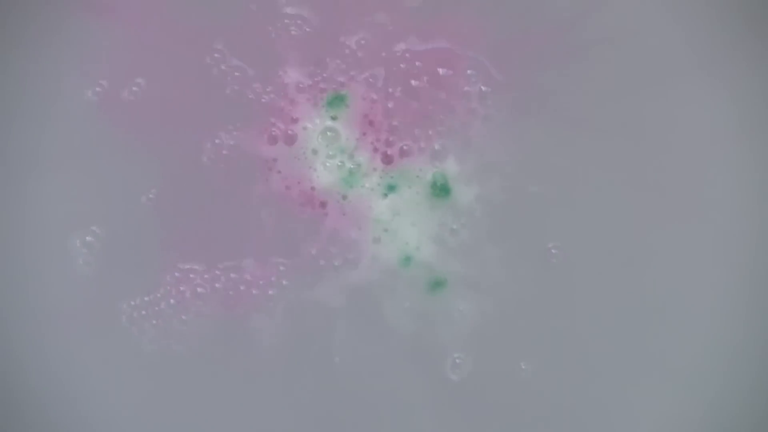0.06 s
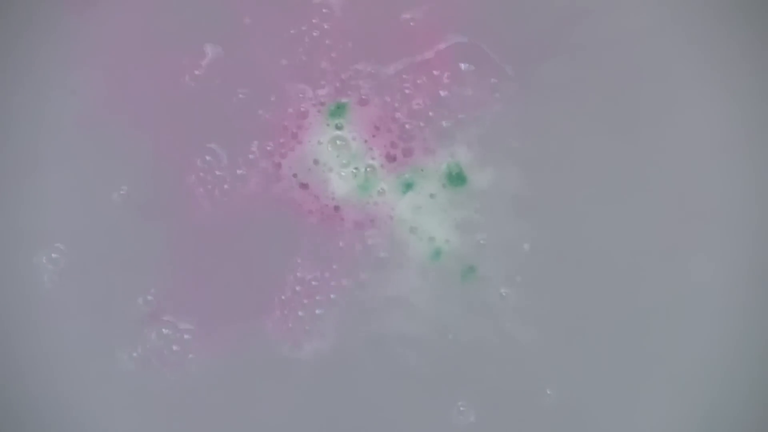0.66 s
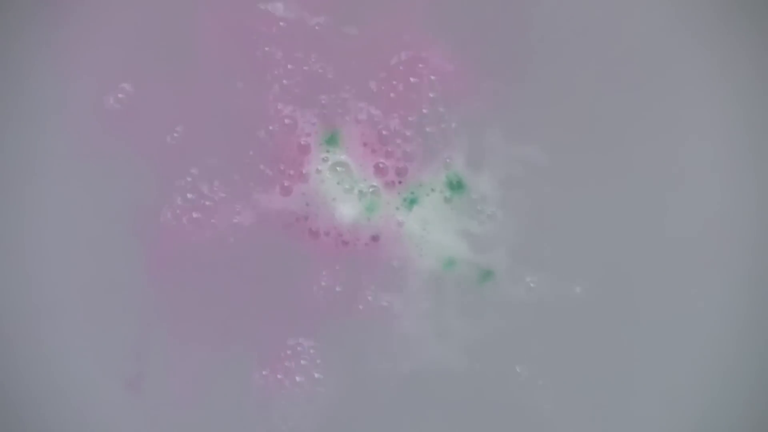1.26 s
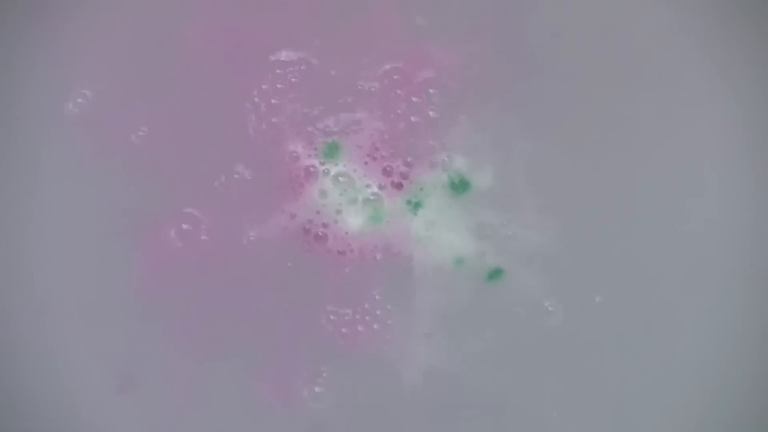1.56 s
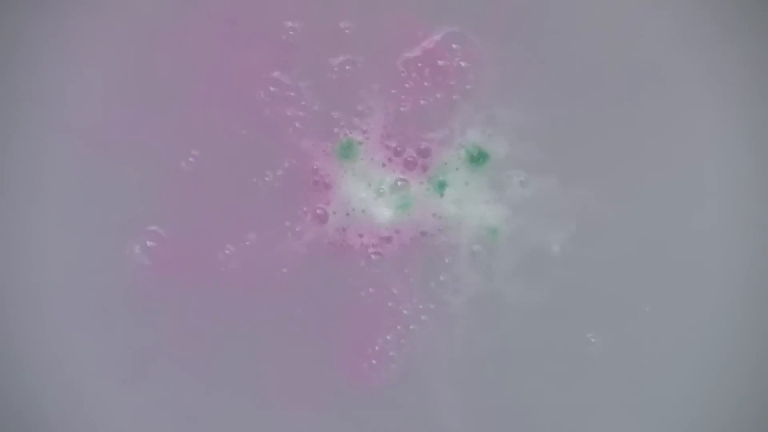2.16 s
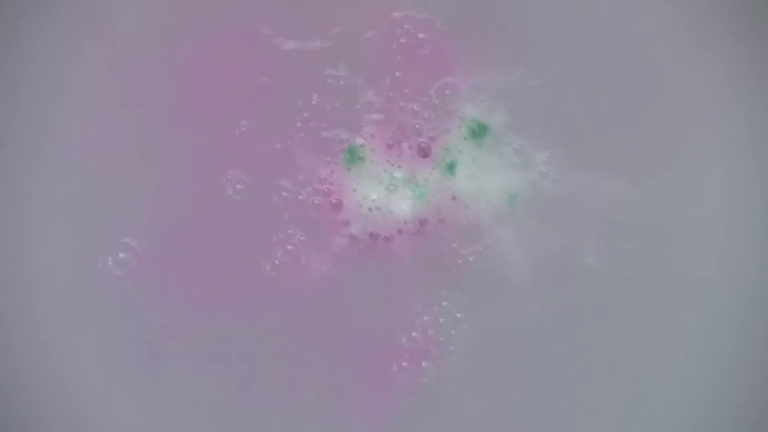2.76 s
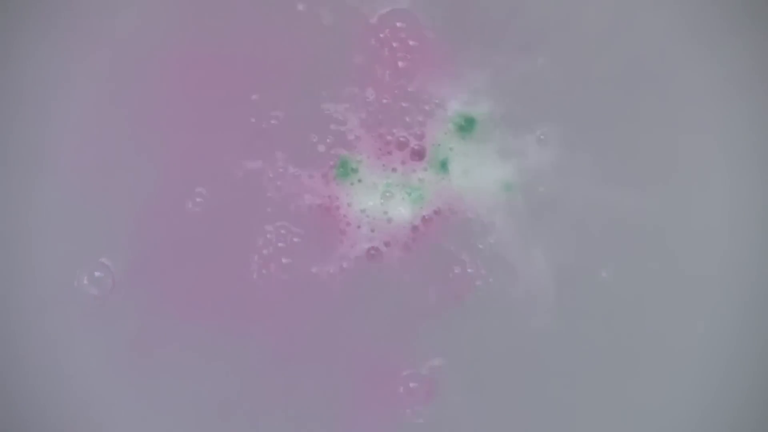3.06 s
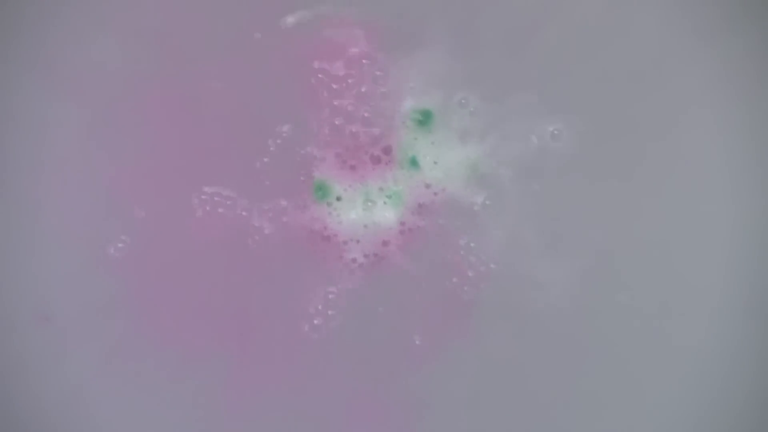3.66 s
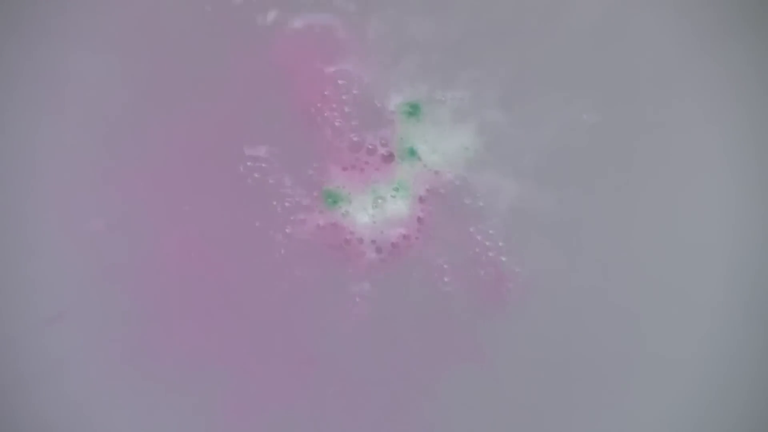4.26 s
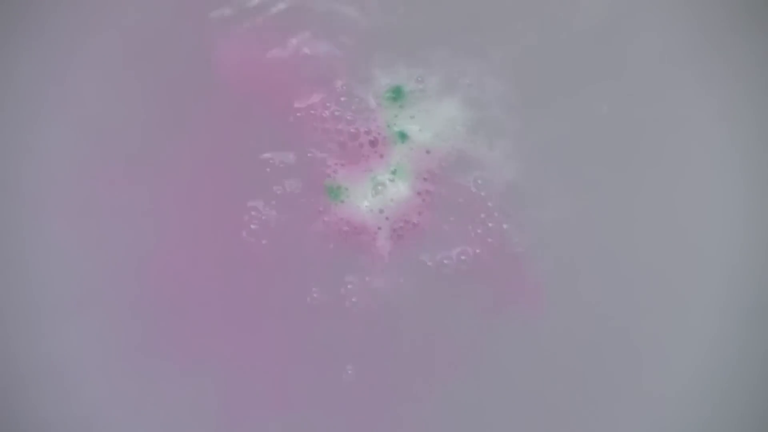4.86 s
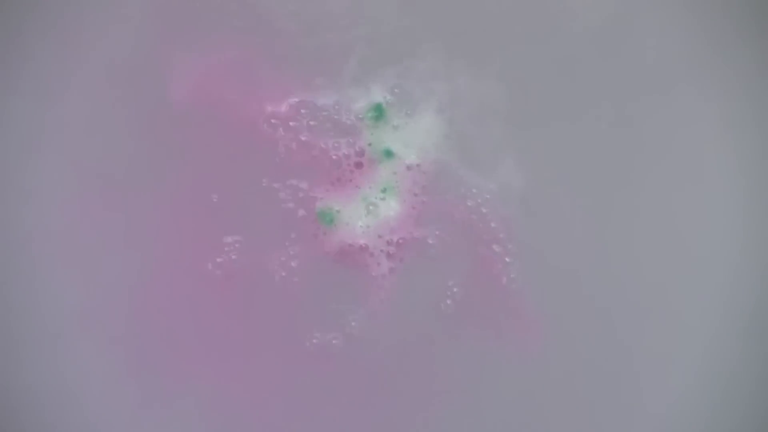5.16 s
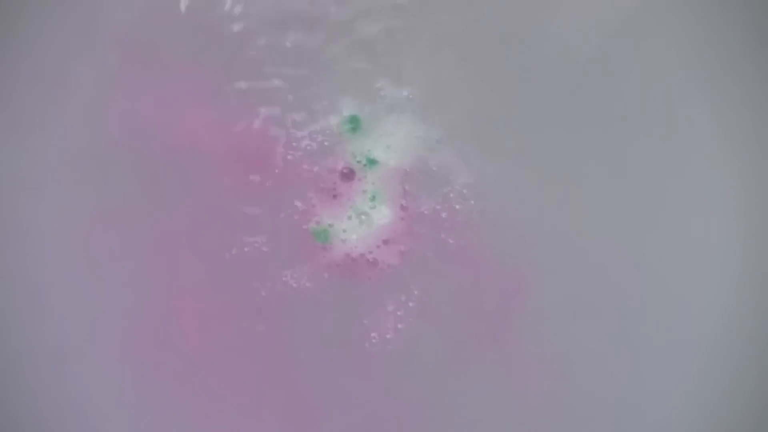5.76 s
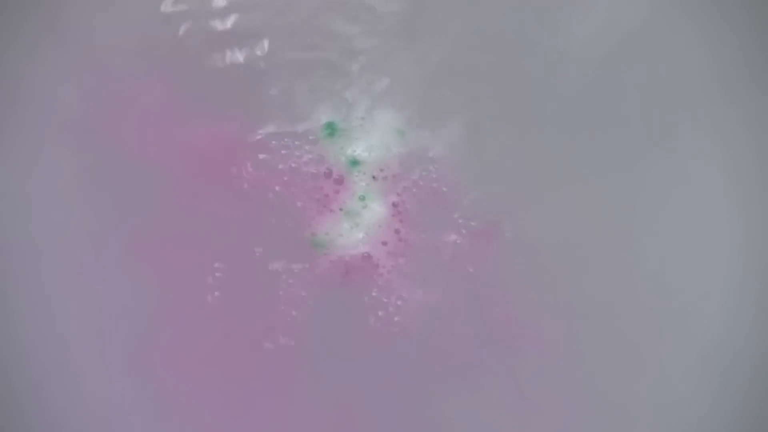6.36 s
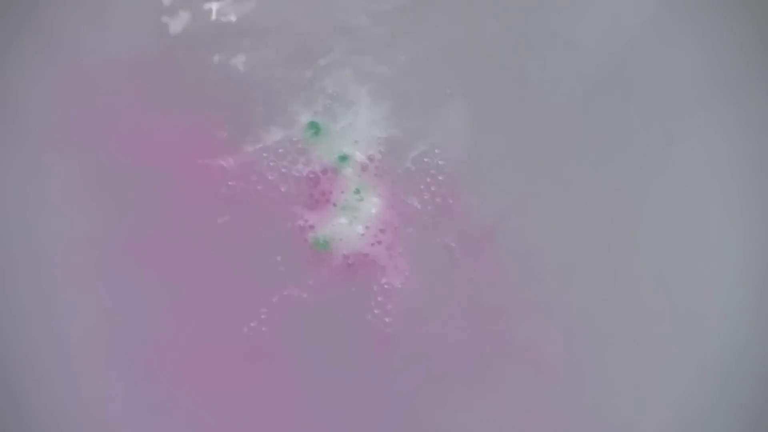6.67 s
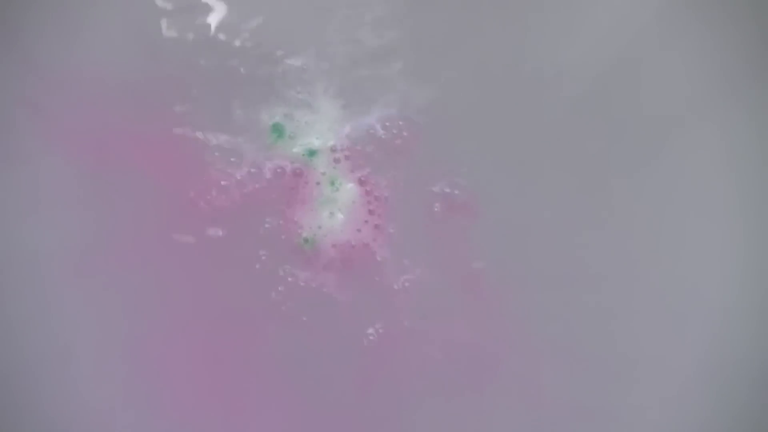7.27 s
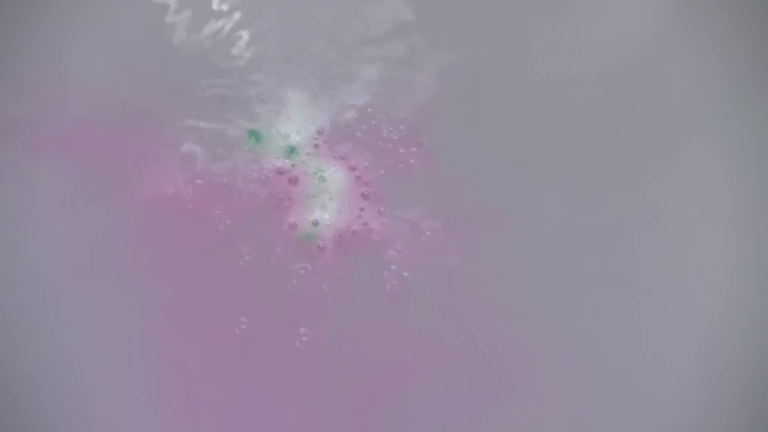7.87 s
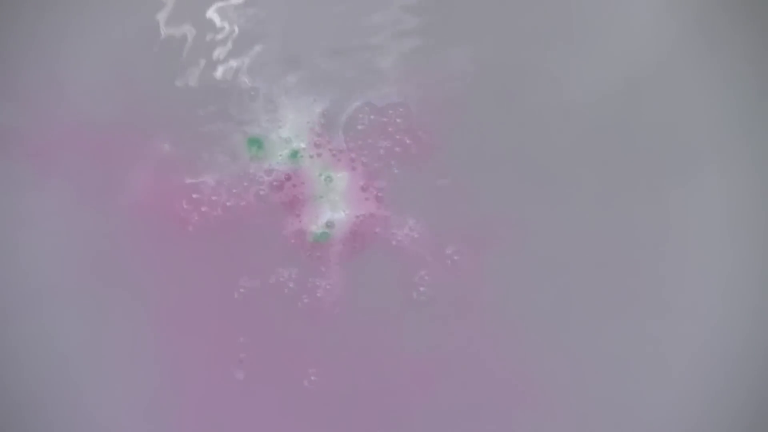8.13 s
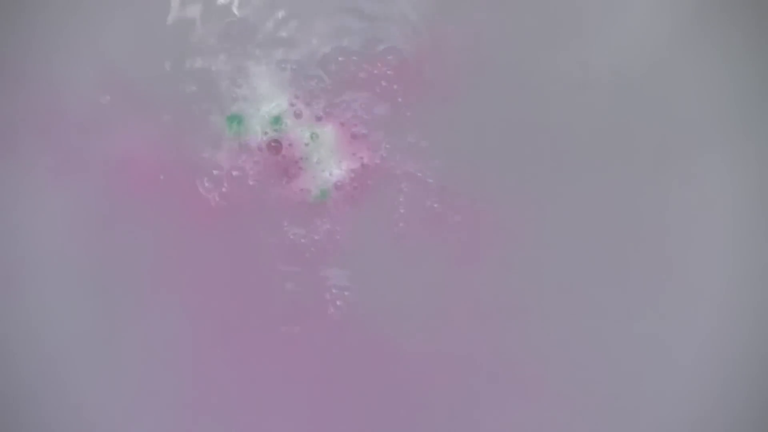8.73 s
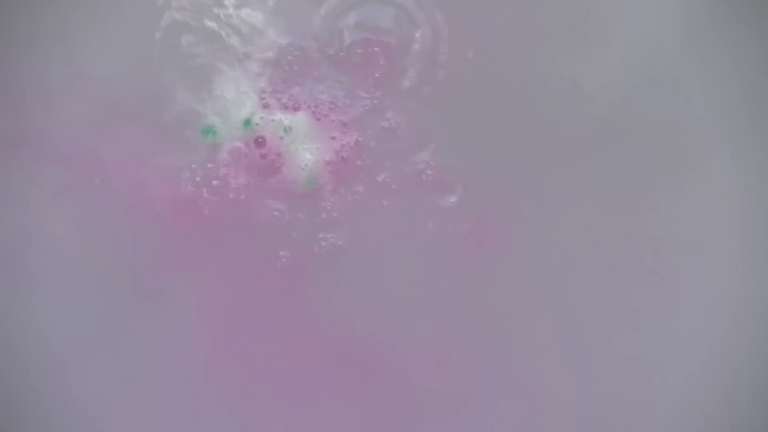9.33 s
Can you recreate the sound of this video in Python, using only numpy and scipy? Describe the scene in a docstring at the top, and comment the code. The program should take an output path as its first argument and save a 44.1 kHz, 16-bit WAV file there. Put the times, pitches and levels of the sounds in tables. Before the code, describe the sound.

A bath bomb fizzes steadily in a tub of water, with one sharp ringing knock and a few faint taps later on.

```python
"""A bath bomb fizzes close by in a full tub, over the faint hush of a small bathroom.
From the start, thousands of tiny gas bubbles burst each second and a few larger ones ping.
The fizz slowly ebbs as the lump dissolves, and its colour shifts as the lump drifts.
At 6.7 s a sharp knock sets the tub ringing; three light taps follow, then a dull bump at 9.5 s."""
import sys
import numpy as np
from scipy import signal
from scipy.fft import rfft, irfft
from scipy.io import wavfile
from scipy.ndimage import uniform_filter1d

SR = 44100
rng = np.random.default_rng(int(sys.argv[2]) if len(sys.argv) > 2 else 0)


def to_wav(s):
    """Save 16-bit WAV."""
    ch = np.atleast_2d(s).T  # columns
    pcm = np.round(np.clip(ch, -1, 1) * 32767)  # PCM
    wavfile.write(sys.argv[1], SR, pcm.astype(np.int16))


N = 423360
TIME = np.arange(N) / SR

# strength of the fizz, ebbing as the lump dissolves: t/s, level/dB
FIZZ_LEVEL = [(0, -36.5), (3.7, -38), (4.3, -39), (6.8, -39.5), (9.6, -40.5)]


def from_db(db):
    """Decibels to gain."""
    return 10 ** (np.asarray(db) / 20)


def unit(x):
    """Scales to rms 1."""
    return x / np.sqrt(np.mean(x ** 2) + 1e-20)


def at_hz(points, hz):
    """Reads a spectrum on a log-frequency axis."""
    f, value = np.transpose(points)
    return np.interp(np.log(hz + 1), np.log(f), value)


def at_time(rows, t):
    """Reads every column of an automation curve."""
    times, *columns = np.transpose(rows)
    return [np.interp(t, times, column) for column in columns]


def bell(hz, centre, octaves):
    """A smooth hump of height 1 on a log-frequency axis."""
    return np.exp(-.5 * (np.log2((hz + 1) / centre) / octaves) ** 2)


def band_rms(x, low_hz, high_hz):
    """Rms of one band of a signal."""
    hz = np.fft.rfftfreq(len(x), 1 / SR)
    band = rfft(x)[(hz > low_hz) & (hz < high_hz)]
    return np.sqrt(2 * np.sum(abs(band) ** 2)) / len(x)


def add(mix, start_s, sound):
    """Mixes a sound in at a time."""
    part = mix[..., round(start_s * SR):][..., :sound.shape[-1]]
    part += sound[..., :part.shape[-1]]


def stereo(pair, colour, width):
    """Colours two unrelated signals as mid and side, and returns left and right."""
    hz = np.fft.rfftfreq(N, 1 / SR)
    spectra = rfft(pair) * from_db(at_hz(colour, hz))
    spectra[1] *= from_db(at_hz(width, hz))
    mid, side = irfft(spectra, N)
    return np.array([mid + side, mid - side])


def click(gain_at, size=4096):
    """A minimum-phase click of energy 1 whose spectrum is the given function of frequency."""
    hz = abs(np.fft.fftfreq(size, 1 / SR))
    log_gain = np.log(gain_at(hz) + 1e-4)
    spectrum = np.exp(np.conj(signal.hilbert(log_gain)))
    pulse = np.fft.ifft(spectrum).real[:size // 2]
    return pulse / np.linalg.norm(pulse)


def room_tone(level_db=-62.0, left_db=-0.84):
    """The faint, steady, diffuse hush of the room."""
    # colour of the hush: f/Hz, level/dB
    colour = [(15, -8), (35, -15.5), (60, -2.5), (95, -0.5), (190, 1), (240, -4.5), (300, 0.5), (450, -7),
              (590, -4), (800, -7), (1100, -8.5), (2000, -9), (4000, -18.5)]
    # its width, side against mid: f/Hz, level/dB
    width = [(30, -3), (120, -1), (300, 3), (700, 2), (1500, 1.5), (3000, -20)]
    noise = stereo(rng.standard_normal((2, N)), colour, width)
    noise /= band_rms(noise.mean(0), 200, 900)
    return from_db([[level_db + left_db], [level_db]]) * noise


def bathroom_reverb(scatter_db=-2, scatter_t60=0.046, tail_db=-3, modes_db=-5, width=0.35):
    """What follows a sound in the tub: quick scatter, the tiled room's tail, ringing modes, echoes."""
    # decay of the bathroom: f/Hz, t60/s
    room_decay = [(200, 0.87), (800, 0.44), (2000, 0.52), (3500, 0.5), (5000, 0.2), (10000, 0.33)]
    # modes of the tub and the air in it: f/Hz, level/dB, t60/s
    tub_modes = [(302, -2, 0.21), (378, -5.5, 0.32), (740, -4, 0.32), (867, -4.5, 0.18), (1020, -14, 0.4),
                 (1310, -4, 0.21), (1555, -8, 0.22), (1880, -2, 0.18), (2050, 0, 0.11), (2060, -8, 0.26),
                 (2256, -1, 0.17), (2710, 10, 0.046), (2840, -9, 0.32), (3000, 0, 0.21), (3230, -9, 0.3),
                 (3375, -3, 0.097), (3450, -24, 0.28), (3760, -22, 0.39), (3900, -29, .26),
                 (4720, -5, 0.27), (4600, -18, .15)]
    # echoes off the tub side and the wall: delay/s, gain
    wall_echoes = [(0.0056, 0.39), (0.026, .1), (0.019, 0.2)]
    t = np.arange(SR * 3 // 5) / SR
    near, far = [mid + width * np.array([side, -side]) for mid, side in rng.normal(size=(2, 2, len(t)))]
    scatter = near * from_db(-60 * t / scatter_t60)
    hz, frame_s, frames = signal.stft(far, SR, nperseg=256)
    frames *= from_db(-60 * frame_s / at_hz(room_decay, hz)[:, None])
    tail = signal.istft(frames, SR, nperseg=256)[1][:, :len(t)]
    modes = np.zeros((2, len(t)))
    for mode_hz, db, t60 in tub_modes:
        phase = 2 * np.pi * rng.random() + width * rng.standard_normal((2, 1))
        modes += from_db(db - 60 * t / t60) * np.sin(2 * np.pi * mode_hz * t + phase)
    layers = [(scatter_db, scatter), (tail_db, tail), (modes_db, modes)]
    out = sum(from_db(db) * unit(layer) for db, layer in layers) / np.sqrt(len(t))
    for delay, gain in wall_echoes:
        add(out, delay, np.full((2, 1), gain))
    return out


def blow(edge_hz, hard_hz=4000, rise_db_per_octave=7, fall_db_per_octave=23):
    """A short push whose spectrum climbs to an edge, then drops; softer blows have gentler slopes."""
    steepness = (edge_hz / hard_hz) ** 0.44

    def gain_at(hz):
        octaves = np.log2((hz + 1) / edge_hz)
        slopes_db = np.minimum(rise_db_per_octave * octaves, -fall_db_per_octave * octaves)
        return from_db(np.maximum(steepness * slopes_db, -45))
    return click(gain_at)


def knocks(room, tick_hz=8000, tick_wet_db=-11, left_lag_s=0.00002, left_db=-0.7):
    """Each blow sets the tub ringing, with a bright tick of contact on top."""
    # blows on the tub: t/s, body/dB, edge/Hz (higher when harder), tick/dB, ring against body/dB
    hits = [(6.6674, 5, 4020, -7, -1), (6.954, -20.5, 3000, -9, -5), (8.594, -28, 2300, -35, -8),
            (9.299, -32, 1710, -40, -9), (9.477, -22, 332, -48, 2)]
    out = np.zeros((2, N))
    contact = click(lambda hz: bell(hz, tick_hz, octaves=0.18))
    for start_s, body_db, edge_hz, tick_db, ring_db in hits:
        body = from_db(body_db) * blow(edge_hz)
        tick = from_db(tick_db) * contact
        send = from_db(ring_db) * body + from_db(tick_wet_db) * tick
        add(out, start_s, body + tick)
        add(out, start_s, signal.fftconvolve(send[None], room, axes=1))
    # the knocks sit a little to the right, so the left is later and weaker
    out[0] = from_db(left_db) * np.interp(TIME - left_lag_s, TIME, out[0])
    return out


def bubble_flurries(count=300, per_flurry=4, usual_hz=4400, offset_db=-10, scatter_s=0.035):
    """Middling bubbles in flurries of like pitch, ebbing with the fizz: rows of t/s, level/dB, f/Hz."""
    flurries = count // per_flurry
    flurry_s = np.repeat(rng.random(flurries) * N / SR, per_flurry)
    pitch = np.repeat(np.clip(rng.standard_normal(flurries), -2, 2), per_flurry)
    lag, accent, detune = np.clip(rng.standard_normal((len(flurry_s), 3)), -2, 2).T
    start_s = abs(flurry_s + scatter_s * lag)
    db = at_time(FIZZ_LEVEL, start_s)[0] + offset_db + 2.5 * accent + 2 * pitch
    octaves = 0.35 * pitch + 0.093 * detune
    return np.column_stack([start_s, db, usual_hz * 2 ** octaves])


def bubble_pings(room, t60=0.019, rise_per_s=0.4, wet_db=-13, echo_gain=0.61, echo_span_s=0.01):
    """Bubbles ring briefly, rising a little in pitch; each has three reflections off the tub."""
    # the largest bubbles, then two drips near 9.3 s: t/s, level/dB, f/Hz
    loud_pings = [(.203, -33, 4700), (.281, -38.5, 3150), (.463, -39, 3800), (2.051, -35, 4350),
                  (2.25, -40, 3430), (3.021, -37, 3760), (3.514, -41, 3360), (3.822, -42, 3350),
                  (4.139, -41, 3300), (6.23, -34, 4000), (9.005, -33, 4620), (9.298, -43, 1150),
                  (9.347, -49, 915)]
    out = np.zeros(N)
    t = np.arange(SR // 10) / SR
    for start_s, db, hz in np.vstack([loud_pings, bubble_flurries()]):
        ping = from_db(db - 60 * t / t60) * np.sin(2 * np.pi * hz * t * (1 + rise_per_s * t))
        add(out, start_s, ping)
        for delay in echo_span_s * rng.random(size=3):
            add(out, start_s + delay, echo_gain * ping)
    return out + from_db(wet_db) * signal.fftconvolve(out[None], room, axes=1)[:, :N]


def drifting_echoes(x, places=6, t60=0.12, lowpass_hz=4500):
    """Dull reflections off the tub change as the lump floats along: one place fades into the next."""
    position = np.linspace(0, places - 1, N)
    t = np.arange(SR // 8) / SR
    out = np.zeros((2, N))
    for place in range(places):
        crossfade = np.sqrt(np.maximum(1 - abs(position - place), 0))
        echoes = rng.standard_normal(len(t)) * from_db(-60 * t / t60)
        out += signal.oaconvolve(x * crossfade, echoes[None] / np.linalg.norm(echoes), axes=1)[:, :N]
    return signal.lfilter(*signal.butter(1, lowpass_hz, fs=SR), out)


def drift_colour(x, dip_db=5, lift_db=2.5, growth_db_per_s=0.44):
    """The drifting lump's direct and reflected sound cancel in one band and add up just under it."""
    # the notch cut by an echo off the tub: t/s, f/Hz, echo strength (0-1)
    notch_path = [(1.2, 4360, 0), (3.6, 4030, 0.7), (4.6, 3740, 0.7), (6.6, 3470, 0.4), (7.5, 3100, 0.8),
                  (9.6, 2950, 0.7)]
    hz, t, frames = signal.stft(x, SR, nperseg=1024, noverlap=768)
    hz = hz[:, None]
    dip_hz, strength = at_time(notch_path, t)
    dip = dip_db * bell(hz, dip_hz, octaves=0.043)
    lift = lift_db * bell(hz, 0.786 * dip_hz, octaves=0.14)
    # a narrow hump stays in the hiss, while a wider, higher band comes up steadily
    steady_hump = 1.5 * bell(hz, 4510, octaves=0.032)
    growing_hump = (growth_db_per_s * t - 1.3) * bell(hz, 5400, octaves=0.11)
    frames *= from_db(strength * (lift - dip) + steady_hump + growing_hump)
    return signal.istft(frames, SR, nperseg=1024, noverlap=768)[1][:, :N]


def tiny_bursts(sizes=32, spread_db=1.5, ring_cycles=18):
    """Bubbles burst at random, each a few dying cycles; the smallest are by far the most common."""
    out = np.zeros(N)
    for hz in np.geomspace(900, 17000, sizes):
        count = int(N / SR * (hz / 150) ** 2)
        onsets = rng.integers(0, N, count)
        kicks = np.bincount(onsets, from_db(spread_db * rng.exponential(size=count)), N)
        t60 = ring_cycles / hz
        t = np.arange(int(t60 * SR)) / SR
        ping = np.cos(2 * np.pi * hz * t) * from_db(-60 * t / t60)
        out += np.sqrt(hz) * unit(signal.oaconvolve(kicks - kicks.mean(), ping)[:N])
    return out


def fizz(wet_db=-6.5, flutter_db=0.67):
    """The foam's hiss: gas comes off in little spurts, and less of it as the lump dissolves."""
    # colour of the bursting foam: f/Hz, level/dB
    colour = [(500, -59), (1200, -25), (2200, -17), (3200, -12.5), (4200, -9), (5200, -4.5), (6000, -1.5),
              (7400, 0.5), (9000, -0.16), (10500, -0.5), (12000, -3.5), (14000, -9), (15700, -15)]
    # its width, side against mid: f/Hz, level/dB
    width = [(1000, -9), (2000, -3), (3200, -48), (4800, -60), (6300, -30), (8500, -21.5), (11000, -8.5),
             (15000, -8.5)]
    foam = stereo(np.array([tiny_bursts(), tiny_bursts()]), colour, width)
    foam += from_db(wet_db) * drifting_echoes(foam)
    frames = signal.stft(foam, SR, nperseg=1024, noverlap=768)[2]
    spurts = uniform_filter1d(rng.standard_normal(frames.shape[1:]), size=12, axis=1)  # 70 ms long
    spurts = uniform_filter1d(spurts, size=70, axis=0)  # 3 kHz wide
    frames *= from_db(flutter_db * unit(spurts))
    foam = signal.istft(frames, SR, nperseg=1024, noverlap=768)[1][:, :N]
    foam /= band_rms(foam.mean(0), 5000, 15000)
    return foam * from_db(at_time(FIZZ_LEVEL, TIME)[0])


def scene():
    """The drifting bath bomb and the knocks over room tone; pings and knocks share one reverb."""
    room = bathroom_reverb()
    bath_bomb = drift_colour(fizz() + bubble_pings(room))
    return bath_bomb + knocks(room) + room_tone()


def record(dry):
    """A steep low-pass takes off the very top of the treble."""
    lowpass = signal.firwin(1023, cutoff=15800, window=("kaiser", 9), fs=SR)
    return signal.oaconvolve(dry, lowpass[None], "same")


dry = scene()
out = record(dry)
to_wav(out)
```